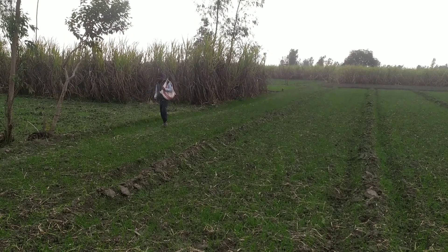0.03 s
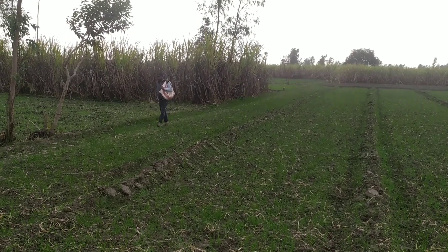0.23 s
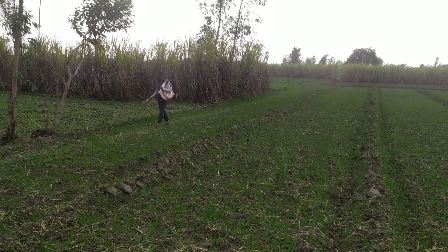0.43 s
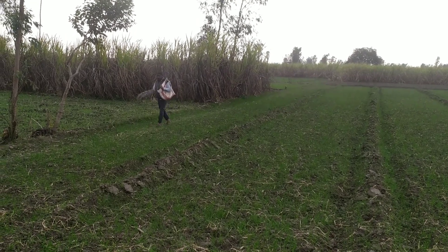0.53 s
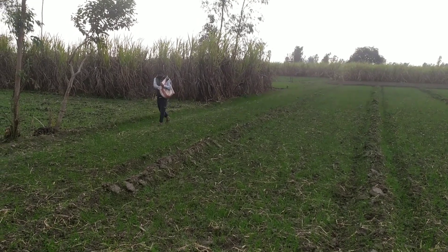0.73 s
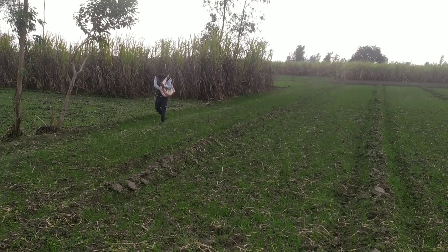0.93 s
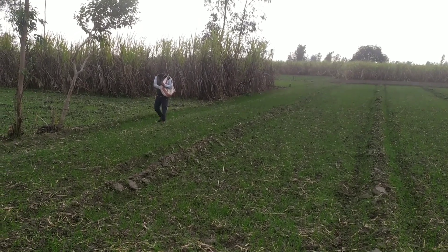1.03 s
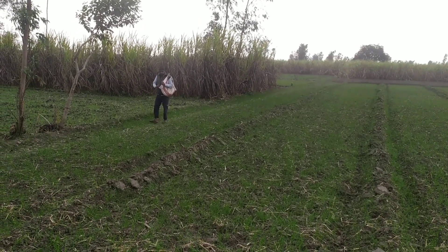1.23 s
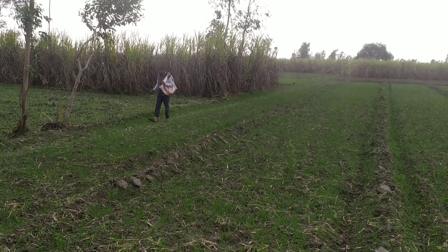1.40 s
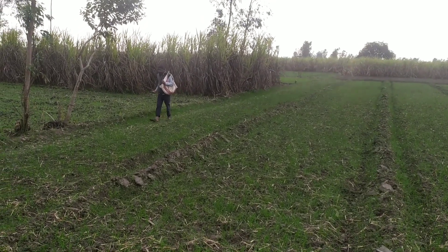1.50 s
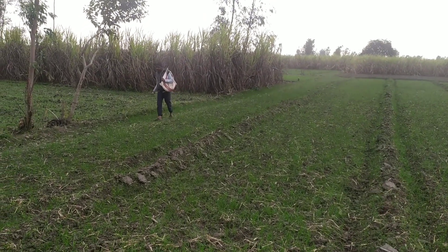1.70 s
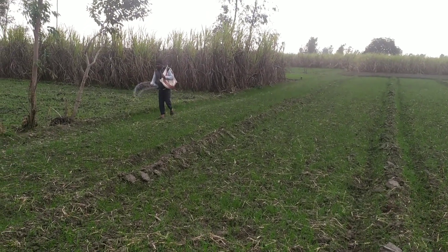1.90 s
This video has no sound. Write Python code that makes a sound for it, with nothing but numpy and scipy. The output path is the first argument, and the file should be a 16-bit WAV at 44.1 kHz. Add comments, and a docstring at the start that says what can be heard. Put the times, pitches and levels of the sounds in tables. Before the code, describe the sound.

Granules thrown by hand patter on a young crop twice, with stray grains ticking sharply close to the microphone. A breeze rustles tall cane on the left and softly buffets the right side. A slow engine putters faintly far off.

```python
"""Granules patter on the leaves of a young crop: two hand throws, stray grains ticking close by.
Each near grain cracks on a leaf or straw and rings it briefly; fine spray and brushed foliage swish.
A breeze rustles tall cane on the left and buffets mainly the right microphone port, with soft pops.
Far off are faint gliding calls and the exhaust puffs of a slow engine, louder towards the end."""
import sys
import numpy as np
from scipy import signal
from scipy.fft import rfft, irfft, next_fast_len
from scipy.io import wavfile
from scipy.ndimage import uniform_filter1d, map_coordinates

SR = 44100
rng = np.random.default_rng(int(sys.argv[2]) if len(sys.argv) > 2 else 0)


def waveform_to_disk(signal):
    """Save audio, clipped to [-1, 1], as 16-bit WAV at the path in sys.argv[1]."""
    frames = np.transpose(np.atleast_2d(signal))
    scaled = np.clip(frames, -1, 1) * 32767
    samples = np.round(scaled).astype(np.int16)
    wavfile.write(sys.argv[1], SR, samples)


N = 85995


def amp(db):
    """Decibels to gain."""
    return 10 ** (np.asarray(db) / 20)


def unit(x):
    """Scale to rms 1."""
    return x / np.sqrt(np.mean(x ** 2) + 1e-20)


def along(points, hz):
    """Interpolate (freq_hz, value) points on a log frequency axis."""
    freq_hz, values = np.transpose(points)
    return np.interp(np.log(hz + 1), np.log(freq_hz + 1), values)


def curve(points):
    """Interpolate (time_s, value) points to one value per sample."""
    return np.interp(np.arange(N) / SR, *np.transpose(points))


def wobble(knots_per_s):
    """Smooth random curve."""
    return map_coordinates(rng.standard_normal(N // 100), [np.arange(N) * knots_per_s / SR], mode="wrap")


def filtered(x, response):
    """Apply the gain response(hz) by zero-padded FFT."""
    n = x.shape[-1]
    padded = next_fast_len(n + 8192)
    return irfft(rfft(x, padded) * response(np.fft.rfftfreq(padded, 1 / SR)), padded)[..., :n]


def pan(db):
    """Stereo gains for a left-minus-right level."""
    return amp(np.array([[db], [-db]]) / 2)


def add(track, start_s, sound):
    """Mix a sound into the track."""
    part = track[..., max(round(start_s * SR), 0):][..., :sound.shape[-1]]
    part += sound[..., :part.shape[-1]]


def stereo_noise(spectrum, correlation):
    """Noise of rms 1 with a given spectrum and left-right correlation."""
    def mid_side_gains(hz):
        angle = np.arccos(np.clip(along(correlation, hz), -1, 1)) / 2
        return amp(along(spectrum, hz)) * [np.cos(angle), np.sin(angle)]
    mid, side = filtered(rng.standard_normal((2, N)), mid_side_gains)
    return unit(np.array([mid + side, mid - side]))


def burst(noise, t60_s):
    """Noise decaying exponentially from about rms 1."""
    fade = np.exp(-np.log(1000) * np.arange(noise.shape[-1]) / SR / t60_s)
    return unit(noise * fade) * np.sqrt(np.mean(fade ** 2))


def open_air(level_db=-58.5, pan_db=1):
    """Steady hiss of open air."""
    spectrum = [(100, -7.5), (220, -0.5), (320, 2.5), (450, -2), (700, -2.5), (1100, -5), (2000, -7),
                (4000, -9.5), (5600, -3.5), (8500, -5), (11000, -8), (14000, -12), (16000, -41)]  # freq_hz, gain_db
    correlation = [(200, 0.55), (550, 0.5), (1000, -0.55), (2000, -0.41), (4000, -0.7), (8000, -0.006),
                   (12000, -0.14)]  # freq_hz, left_right_correlation
    return amp(level_db) * pan(pan_db) * stereo_noise(spectrum, correlation)


def far_calls():
    """Thin gliding tones, perhaps birds, barely above the air."""
    calls = [(0.015, 0.041, -72.5, 1474, 1330, 1260), (0.307, 0.078, -76, 1380, 1346, 1270),
             (0.804, 0.0293, -58, 6620, 6200, 5840), (1.115, 0.19, -71, 611, 699, 544)]  # start_s, length_s, level_db, start_hz, middle_hz, end_hz
    out = np.zeros(N)
    for start_s, length_s, level_db, *glide_hz in calls:
        progress = np.linspace(0, 1, int(length_s * SR))
        pitch_hz = np.polyval(np.polyfit([0, .5, 1], glide_hz, 2), progress)
        envelope = amp(level_db) * np.sqrt(np.abs(np.sin(np.pi * progress)))
        add(out, start_s, envelope * np.sin(2 * np.pi * np.cumsum(pitch_hz) / SR))
    return out


def far_engine(period_s=.0405, anchor_s=1.545, scatter_db=1, detune=.02):
    """Each firing is a rounded puff in the exhaust's resonances, much like the one before."""
    levels = [(0, -73), (.7, -62), (.95, -63.5), (1.3, -59.5), (1.48, -60), (1.55, -53.5), (1.75, -56.5),
              (1.95, -55.5)]  # time_s, level_db
    resonances = [(319, 0.5, 0.0043), (129, -5, 0.0055), (530, -20, 0.0026)]  # pitch_hz, gain_db, half_length_s
    cycles = (np.arange(N) / SR - anchor_s) / period_s
    firing = np.round(cycles).astype(int)
    t = (cycles - firing) * period_s  # from the nearest firing
    strength, tuning = rng.standard_normal(size=(128, 2))[firing].T
    puffs = sum(amp(db) * np.exp(-(t / half_s) ** 2) * np.sin(2 * np.pi * hz * (1 + detune * tuning) * t)
                for hz, db, half_s in resonances)
    return amp(curve(levels) + scatter_db * strength) * puffs


def cane_rustle(gain_db=1.5, flutter_db=1.3, pan_db=9.5, correlation=0.23):
    """Cane leaves on the left rustle with the breeze."""
    breeze = [(0, -64), (.22, -65.5), (.33, -63), (.72, -64.5), (.87, -62), (1.0, -63.5), (1.2, -63),
              (1.3, -62.5), (1.55, -62.5), (1.72, -67), (1.81, -62.5), (1.87, -64), (1.95, -65)]  # time_s, level_db
    spectrum = [(900, -57), (1400, -8.5), (2400, 3), (3000, 2.5), (4200, 4), (5500, -5), (8000, -9),
                (12000, -12.5), (16000, -52)]  # freq_hz, gain_db
    envelope = amp(curve(breeze) + gain_db + flutter_db * wobble(30.4))
    return envelope * stereo_noise(spectrum, [(3000, correlation)]) * pan(pan_db)


def buffeting(left_db=0.5, right_db=4, flutter_db=1, smooth_s=.04, evening=.7):
    """Gusts rumble on each port separately, harder on the right."""
    gusts = [(0, -52), (.12, -43), (.165, -51), (.24, -37.5), (.28, -43), (.315, -37), (.35, -49.5),
             (.39, -45), (.45, -38.5), (.54, -42.5), (.6, -42), (.645, -49.5), (.72, -43), (.82, -53),
             (.89, -44), (.93, -51), (.98, -44), (1.05, -41.5), (1.11, -52), (1.24, -52), (1.38, -45.5),
             (1.45, -48.5), (1.63, -51), (1.71, -44), (1.78, -51), (1.95, -56)]  # time_s, level_db
    spectrum = [(20, -34), (32, -20.5), (45, 3), (62, 3.5), (85, -0.5), (125, -13.5), (180, -21),
                (260, -70), (500, -52), (1200, -136)]  # freq_hz, gain_db
    wobble_db = flutter_db * np.array([wobble(13.3), wobble(13.45)])
    rumble = stereo_noise(spectrum, correlation=[(60, 0.11)])
    running_rms = np.sqrt(np.abs(uniform_filter1d(rumble ** 2, int(smooth_s * SR))))
    even_rumble = unit(rumble / running_rms ** evening)  # so the gusts set the swells
    return amp(curve(gusts) + wobble_db + [[left_db], [right_db]]) * even_rumble


def eddy_pops(end_hz=47.4, sag_s=0.0077, rise_s=0.00063, lowpass_hz=312):
    """An eddy hits a port, mostly the right: a quick pressure swing that slows as it dies."""
    eddies = [(0.237, -32.5, 163, .09, 13), (.243, -29.5, 137, 0.13, -14), (0.454, -23.5, 126, 0.069, -16),
              (0.4707, -13, 162, 0.13, -30), (1.0362, -28, 107, 0.18, -44), (1.264, -17.5, 157, .11, -40),
              (1.672, -33, 96, 0.15, -12), (1.719, -32.5, 83.5, 0.095, -15)]  # start_s, level_db, start_hz, t60_s, pan_db
    out, t = np.zeros((2, N)), np.arange(SR // 5) / SR
    for start_s, level_db, start_hz, t60_s, pan_db in eddies:
        pitch_hz = end_hz + (start_hz - end_hz) * np.exp(-t / sag_s)
        envelope = amp(level_db - 60 * t / t60_s) * (1 - np.exp(-t / rise_s))
        swing = -envelope * np.sin(2 * np.pi * np.cumsum(pitch_hz) / SR)
        add(out, start_s, swing * pan(pan_db) / pan(pan_db).max())
    return filtered(out, lambda hz: 1 / (1 + (hz / lowpass_hz) ** 4))


def swishes(pan_db=3):
    """Fine spray and brushed leaves give short, smooth swells of band noise."""
    swells = [(0.398, -60, 0.067, 11400, 0.34), (0.842, -66.5, 0.053, 694, 0.63),
              (0.885, -58, 0.009, 1780, 1.6), (1.019, -64.5, 0.037, 1210, 1.3),
              (1.153, -63, .06, 3580, 0.72), (1.325, -60, .035, 12300, .3), (1.406, -59, 0.037, 4060, 0.69)]  # peak_s, level_db, sigma_s, centre_hz, width_oct
    out, t = np.zeros((2, N)), np.arange(N) / SR
    for peak_s, level_db, sigma_s, centre_hz, width_oct in swells:
        noise = rng.standard_normal((2, N))
        band = filtered(noise, lambda hz: np.exp(-(np.log2((hz + 1) / centre_hz) / width_oct) ** 2))
        out += amp(level_db) * np.exp(-((t - peak_s) / sigma_s) ** 2 / 2) * unit(band)
    return pan(pan_db) * out


def patter(grains_per_s=5000, spread_db=2.5, stereo_scatter=0.68):
    """Handfuls land on the leaves as swelling, thinning showers of tiny impacts."""
    showers = [(.12, -60, 0.01, 0.012, -3), (0.389, -55.5, 0.097, 0.088, 2),
               (.575, -58.5, 0.07, 0.071, -3.5), (.70, -58, 0.06, 0.057, -2), (.85, -59.5, 0.02, 0.058, 0),
               (1.1, -57, 0.094, 0.11, 0), (1.21, -56.5, 0.028, 0.029, 0.5), (1.329, -52, 0.05, 0.067, 2.5),
               (1.52, -58.5, 0.086, 0.03, 0), (1.62, -62, 0.037, 0.033, -3)]  # peak_s, level_db, rise_s, fall_s, pan_db
    spectrum = [(1500, -60), (3500, -6.5), (5500, -3.5), (7500, 0.5), (9200, 2), (10500, -3.5),
                (13000, -4.5), (15500, -17)]  # freq_hz, gain_db
    power, t = np.zeros((2, N)), np.arange(N) / SR
    for peak_s, level_db, rise_s, fall_s, pan_db in showers:
        width_s = np.where(t < peak_s, rise_s, fall_s)
        power += (amp(level_db) * pan(pan_db)) ** 2 * np.exp(-((t - peak_s) / width_s) ** 2)
    sizes = amp(spread_db * np.minimum(rng.exponential(size=N), 4))
    lands = rng.random(N) < grains_per_s / SR
    centred = rng.choice([-1, 1], N) * (1 - stereo_scatter)
    hits = sizes * lands * (centred + stereo_scatter * rng.standard_normal((2, N)))
    return np.sqrt(power) * unit(filtered(hits, lambda hz: amp(along(spectrum, hz))))


def near_grains(ring_t60_s=0.0098, crack_t60_s=0.0082, rise_s=0.00058,
                snap_db=11, snap_delay_s=.0009, mono_mix=0.34):
    """Each grain snaps and cracks on a leaf or straw, which rings for a few milliseconds."""
    ticks = [(0.508, -24.5, 8200, 4, -5.5, 0.084), (0.5152, -35, 8250, 10, -10, .15),
             (0.55, -34, 7960, 6, -14, 0.13), (0.571, -37, 8300, 2, -9, .12),
             (0.5956, -36.5, 11000, 11, -7, .2), (0.6126, -32, 12000, 3, -13, 0.17),
             (0.628, -45, 9400, 4, -27, .12), (0.6399, -25.5, 7850, 11, -25, 0.15),
             (0.6624, -26, 7700, 4, -16, 0.16), (0.6777, -31.5, 12600, 6, -3, 0.19),
             (0.6863, -36, 9100, 13, -11, 0.13), (0.705, -37, 7900, 11, -8, .1),
             (0.712, -37, 10500, 5, -1, 0.33), (0.7144, -41, 8600, 9, -10, .12),
             (0.7443, -41, 8240, 6, -12, .08), (0.771, -34.5, 7860, 8, -8, 0.13),
             (1.0513, -32.5, 6400, -2, -6, .14), (1.304, -36, 8550, 5, -14, 0.16),
             (1.318, -35, 7700, 3, -14, .13), (1.3454, -33, 8800, 3, -12, .2),
             (1.3562, -36, 8000, 8, -16, 0.088), (1.37, -37.5, 8000, 2, -12, .11)]  # start_s, level_db, ring_hz, pan_db, crack_over_ring_db, half_width_ratio
    crack_spectrum = [(1500, -52), (3000, -4), (5000, 1), (8000, -7), (13000, 0), (16000, -11)]  # freq_hz, gain_db
    out, t = np.zeros((2, N)), np.arange(SR // 20) / SR
    crack_gain = lambda hz: amp(along(crack_spectrum, hz))
    impulse = signal.unit_impulse(len(t))
    contact = filtered(impulse, lambda hz: crack_gain(hz) * np.exp(-2j * np.pi * hz * snap_delay_s))
    snap = amp(snap_db) * contact / np.linalg.norm(contact)
    attack = 1 - np.exp(-t / rise_s)
    for start_s, level_db, ring_hz, pan_db, crack_db, width in ticks:
        noise = rng.standard_normal((2, 2, len(t))) * (1 - mono_mix)
        noise += rng.standard_normal((2, 1, len(t))) * mono_mix
        ring = filtered(noise[0], lambda hz: 1 / (1 + ((hz - ring_hz) / (width * ring_hz)) ** 2))
        crack = filtered(noise[1], crack_gain)
        tick = burst(ring, ring_t60_s) + amp(crack_db) * (burst(crack, crack_t60_s) + snap)
        add(out, start_s, amp(level_db) * pan(pan_db) * attack * tick / 2)
    return out


def scene():
    """Open field, no echo."""
    granules = near_grains() + patter() + swishes()
    wind = cane_rustle() + open_air() + buffeting() + eddy_pops()
    return granules + wind + far_engine() + far_calls()


def record(dry, low_cut_hz=30, top_hz=15750):
    """Cut the deepest rumble and everything above the band limit."""
    return filtered(dry, lambda hz: (1 - 1 / (1 + (hz / low_cut_hz) ** 6)) * (hz < top_hz))


dry = scene()
out = record(dry)
waveform_to_disk(out)
```